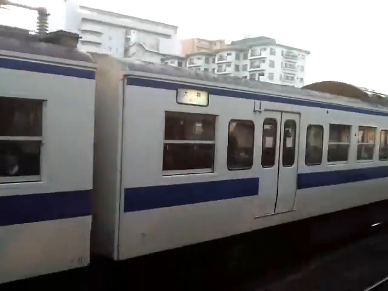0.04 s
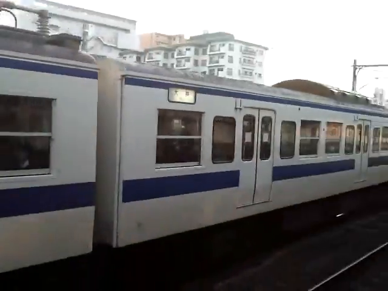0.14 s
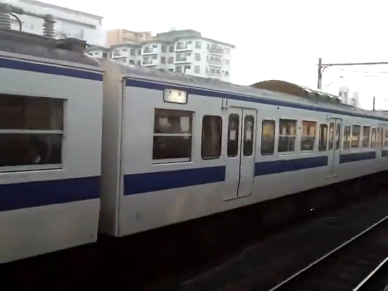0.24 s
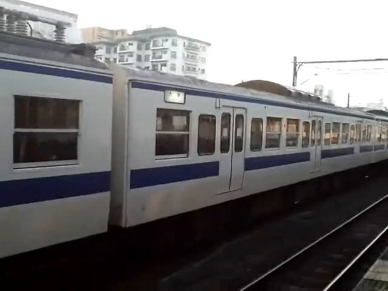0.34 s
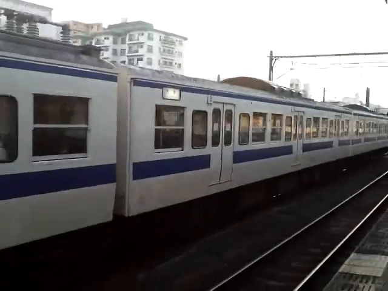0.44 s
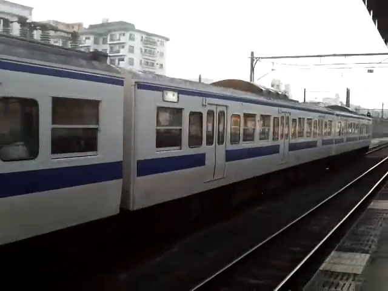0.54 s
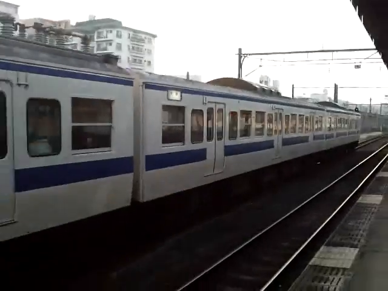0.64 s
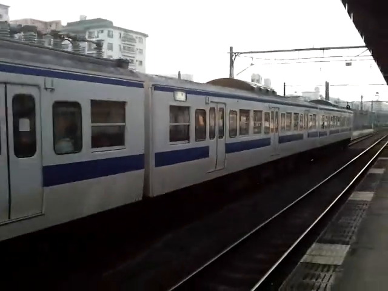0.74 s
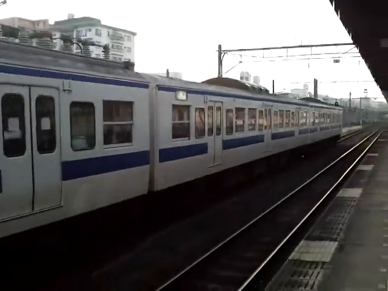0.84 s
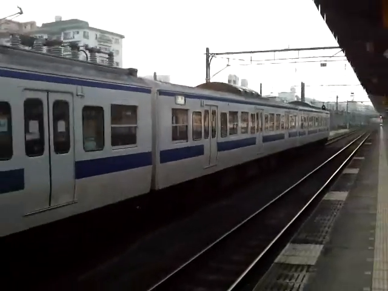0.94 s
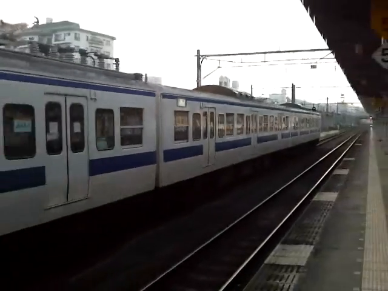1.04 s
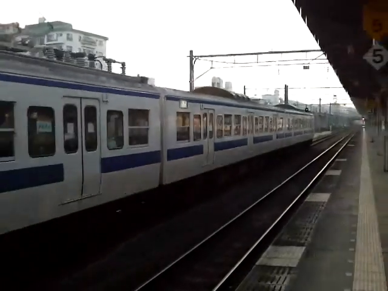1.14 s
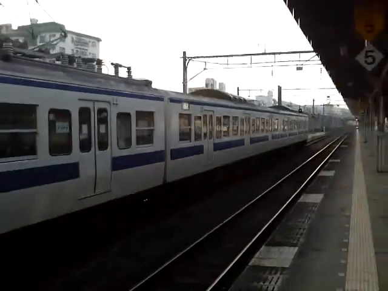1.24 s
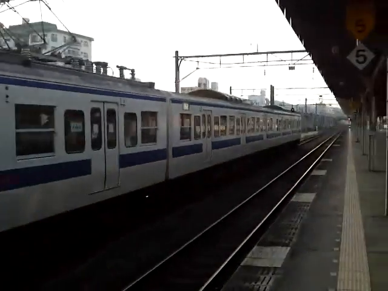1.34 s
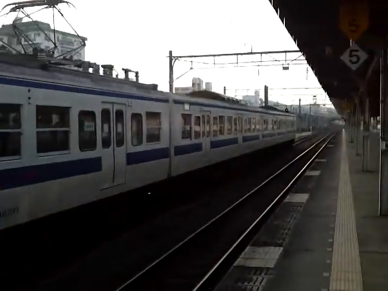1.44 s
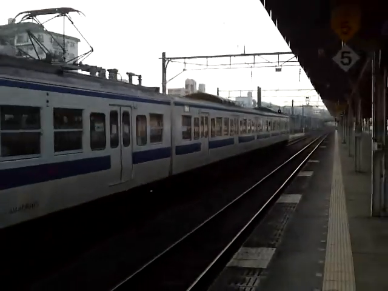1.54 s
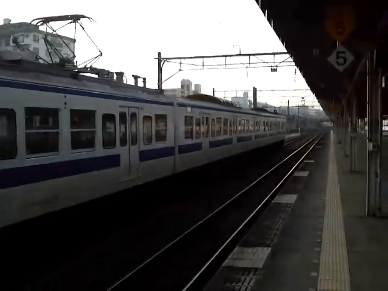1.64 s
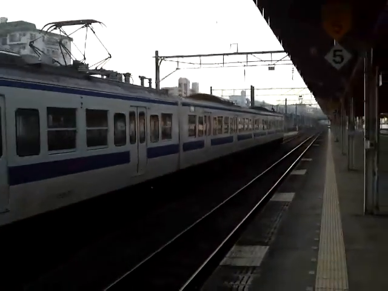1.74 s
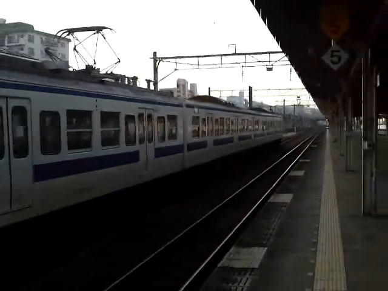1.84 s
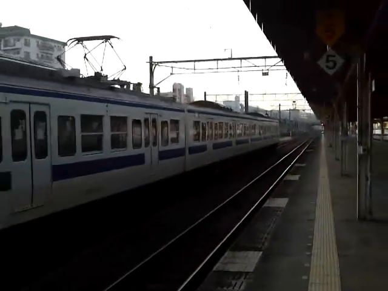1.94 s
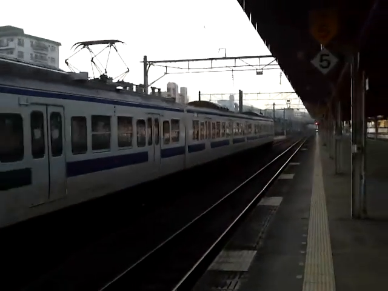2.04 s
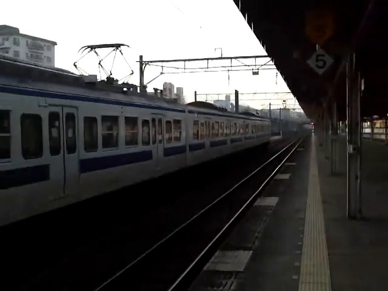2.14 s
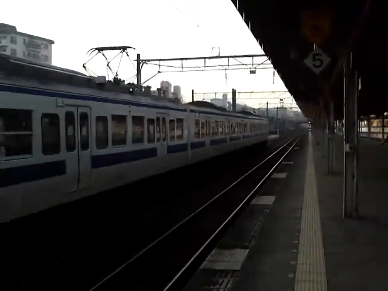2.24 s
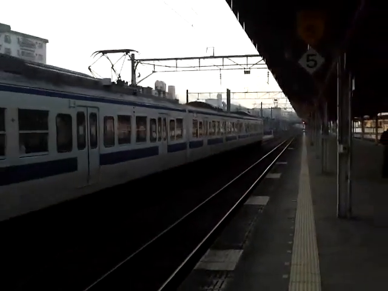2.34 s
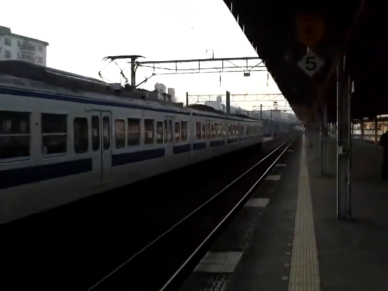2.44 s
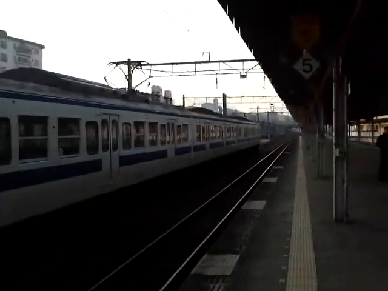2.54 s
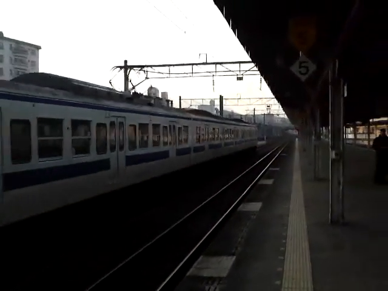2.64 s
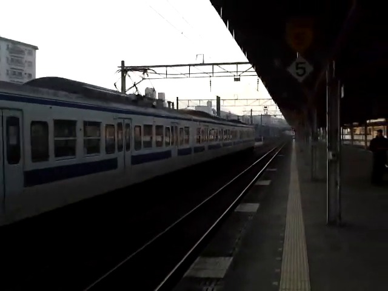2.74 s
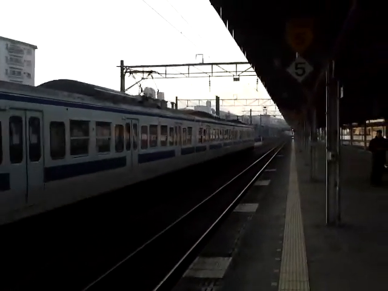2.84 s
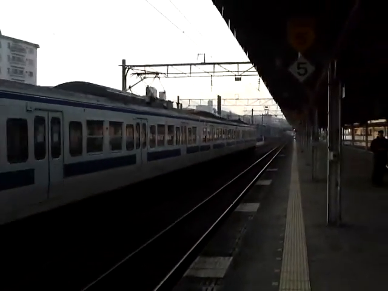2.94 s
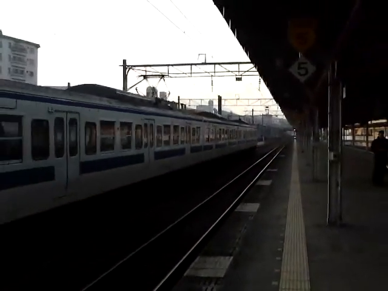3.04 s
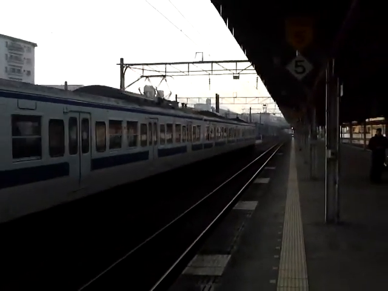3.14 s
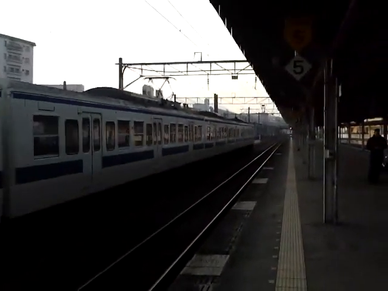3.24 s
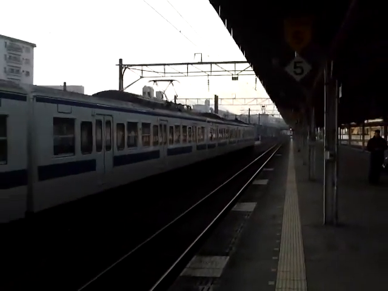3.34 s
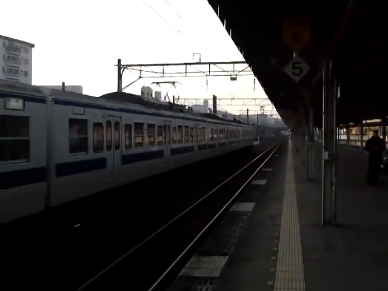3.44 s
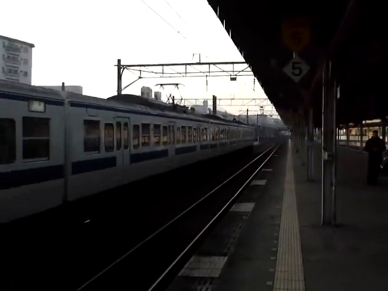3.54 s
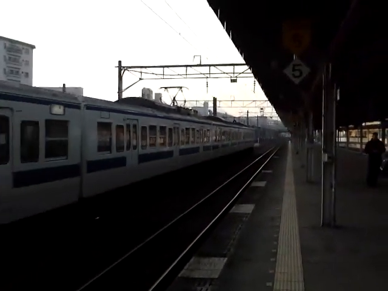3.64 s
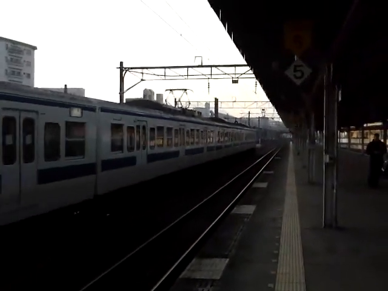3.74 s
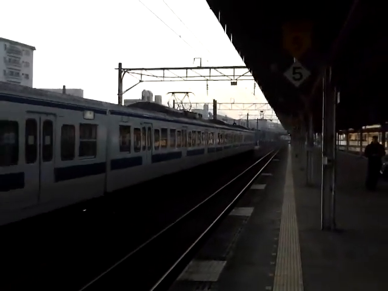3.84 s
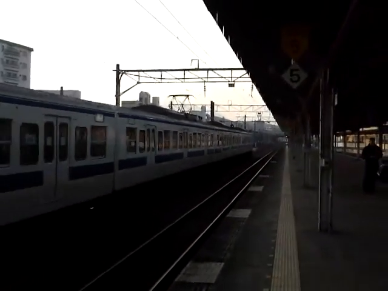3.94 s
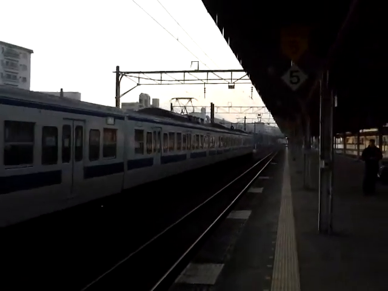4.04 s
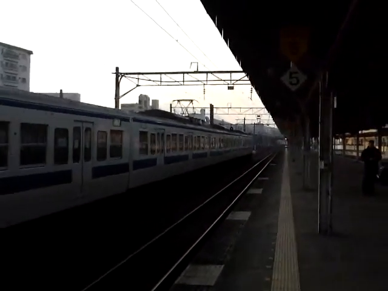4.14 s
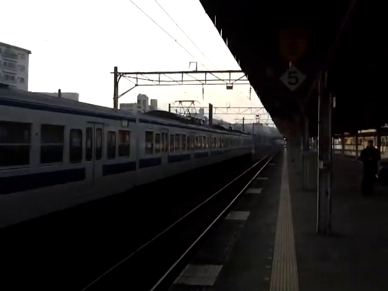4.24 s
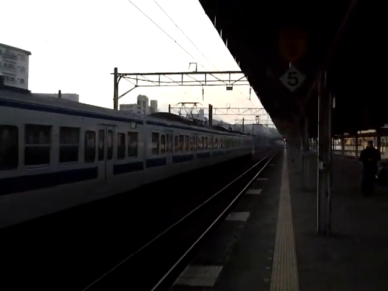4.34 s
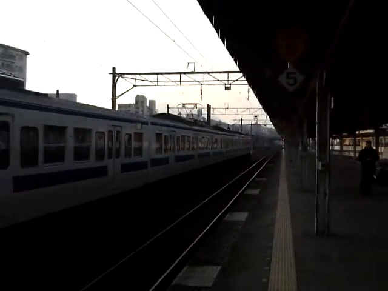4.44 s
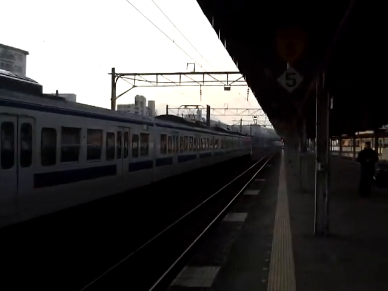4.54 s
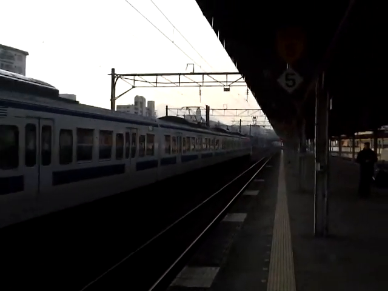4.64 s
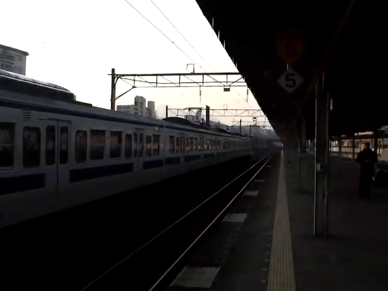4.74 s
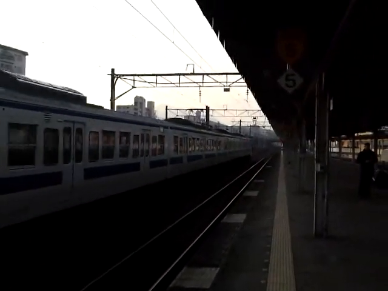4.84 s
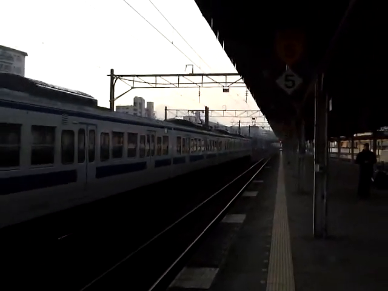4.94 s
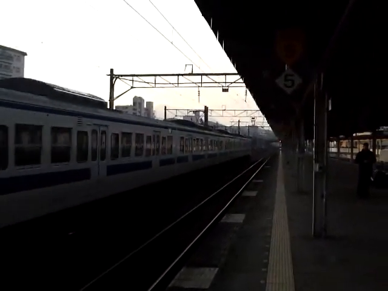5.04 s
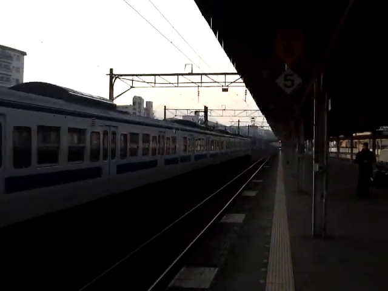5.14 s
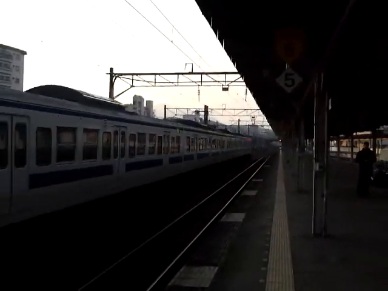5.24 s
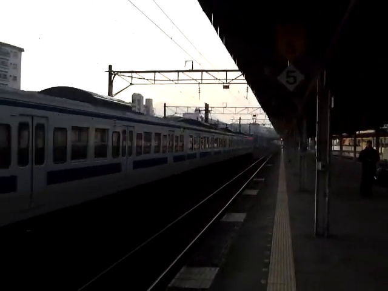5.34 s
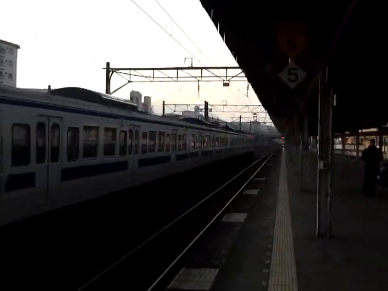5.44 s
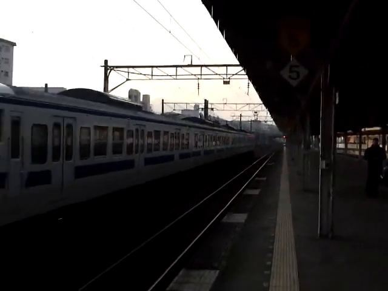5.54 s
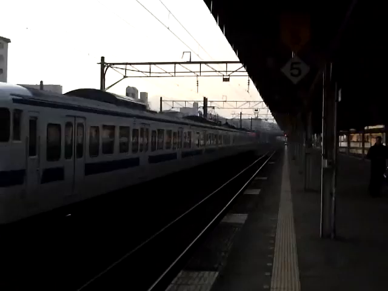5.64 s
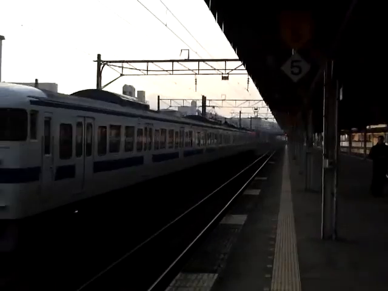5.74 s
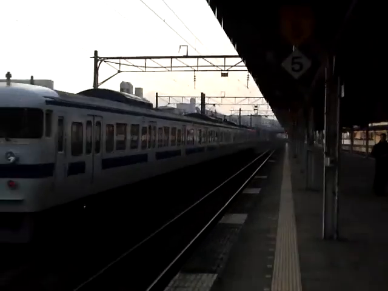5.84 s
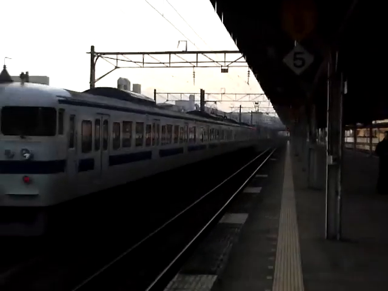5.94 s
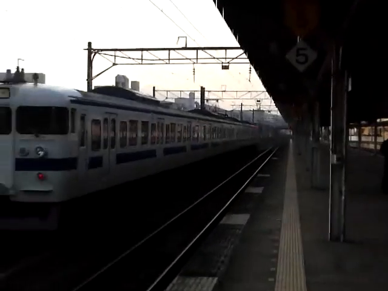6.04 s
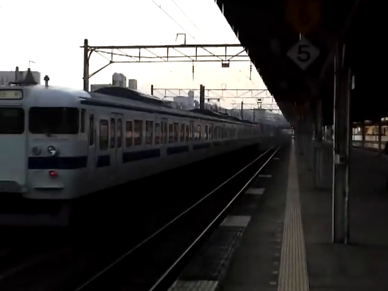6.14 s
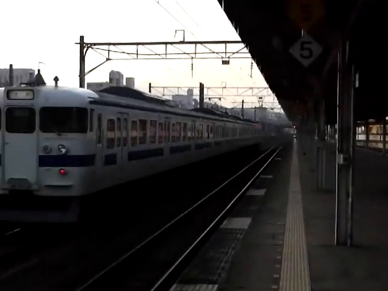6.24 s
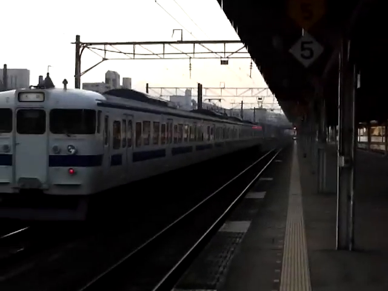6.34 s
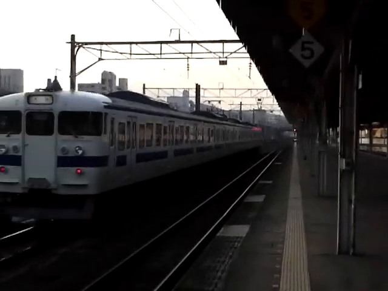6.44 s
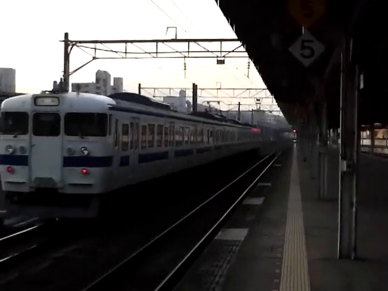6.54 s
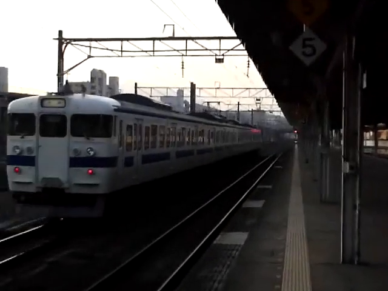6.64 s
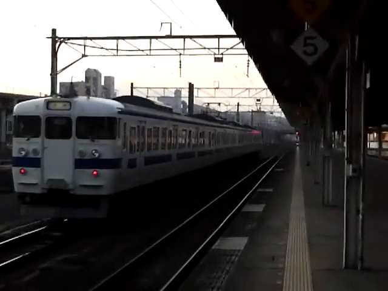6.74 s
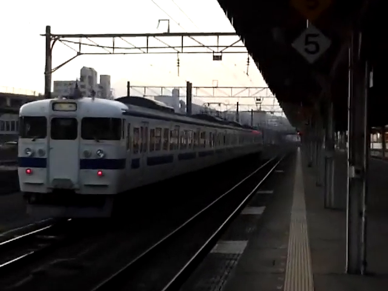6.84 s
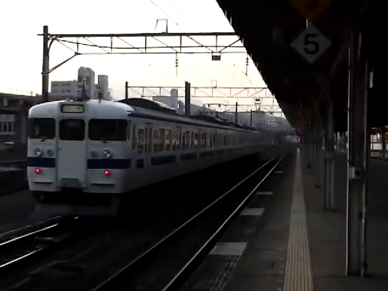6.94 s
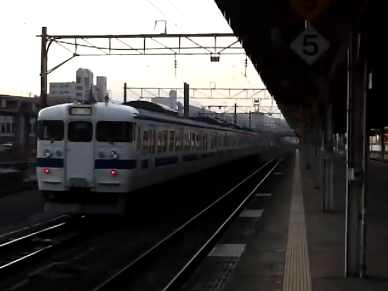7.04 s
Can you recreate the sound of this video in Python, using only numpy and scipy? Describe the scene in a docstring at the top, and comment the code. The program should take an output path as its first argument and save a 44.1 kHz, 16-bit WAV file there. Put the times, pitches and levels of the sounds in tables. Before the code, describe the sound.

Heard from a roofed station platform, an electric train rolls past with a rough steel roar, hiss and rising gear hum. Paired axle clacks strike loudly over a rail joint, ringing under the roof, with dry clicks and one tiny flange squeak. Later the knocks turn faint and smeared as the train recedes. The narrow, thin-bassed microphone distorts on the loudest blows.

```python
"""Steel wheels roar and hiss on the rail as an electric train pulls out along a roofed platform.
The roar is shaped noise; wheel and rail modes and a rising gear hum are wandering sines.
Axles clack over a joint as bursts of noise with a ringing wheel and a tail from the roof.
Dry clicks and a short flange squeak stand out over steady station air.
A narrow-band microphone feeds an input that clips on the loudest blows."""
import sys
import numpy as np
from scipy import signal
from scipy.fft import rfft, irfft, next_fast_len
from scipy.io import wavfile
from scipy.ndimage import uniform_filter1d, map_coordinates

SR = 44100
rng = np.random.default_rng(int(sys.argv[2]) if len(sys.argv) > 2 else 0)


def persist_wave(psi):
    """Save psi, clipped to +-1, as 16-bit WAV."""
    counts = np.round(np.clip(psi, -1, 1) * 32767).astype(np.int16)
    wavfile.write(sys.argv[1], SR, np.atleast_2d(counts).T)


N = 312669
MIC_HZ = 3830  # upper band edge of the microphone


def amp(db):
    """Turn dB into gain."""
    return 10 ** (np.asarray(db) / 20)


def unit(x):
    """Scale x to rms 1."""
    return x / np.sqrt(np.mean(x ** 2) + 1e-20)


def along(points, hz):
    """Read (frequency [Hz], value) points on a log frequency axis, level beyond the ends."""
    f, v = np.transpose(points)
    return np.interp(np.log(hz + 1), np.log(f + 1), v)


def curves(rows):
    """Give one value per sample for each column after the time."""
    s, *cols = np.transpose(rows)
    return [np.interp(np.arange(N) / SR, s, c) for c in cols]


def wobble(rate):
    """Draw a smooth random curve with rate knots a second."""
    knots = rng.standard_normal(int(N * rate / SR) + 4)
    return map_coordinates(knots, [np.arange(N) * rate / SR])


def filtered(x, response):
    """Multiply the spectrum of x by a response of frequency."""
    m = next_fast_len(x.shape[-1] + 8192)
    spectrum = rfft(x, m) * response(np.fft.rfftfreq(m, 1 / SR))
    return irfft(spectrum, m)[..., :x.shape[-1]]


def rush(spectrum, patchy_db):
    """Coloured noise of rms 1 within the microphone's band, in patches of random gain."""
    z = signal.stft(rng.standard_normal(N), nperseg=1024)[2]
    # neighbouring frequencies and moments share their gain
    patches = uniform_filter1d(rng.standard_normal(z.shape), size=4, axis=0)
    patches = uniform_filter1d(patches, size=8, axis=1)
    noise = signal.istft(z * amp(patchy_db * unit(patches)), nperseg=1024)[1][:N]
    return unit(filtered(noise, lambda hz: amp(along(spectrum, hz)) * (hz < MIC_HZ)))


def tone(hz, db, rough, rate):
    """A sine whose phase (rough, radians) and strength wander, with rate knots a second."""
    phase = 2 * np.pi * np.cumsum(hz) / SR + rough * wobble(rate)
    strength = amp(db + 2.9 * rough * wobble(rate))
    return np.sqrt(2) * strength * np.sin(phase)


def rolling():
    """Rough steel on steel: a broad roar and a hiss that shake together."""
    # level of the roar: (time [s], level [dB])
    roar_level = [(0.0, -24), (0.6, -24), (1.26, -23), (1.64, -20.5), (1.91, -24.5), (2.3, -22.5),
                  (2.71, -26), (3.97, -23), (4.48, -27.5), (4.91, -27.5), (5.13, -31.5), (5.53, -31),
                  (6.02, -35.5), (6.65, -45), (7.09, -43.5)]
    # hiss against the roar: (time [s], level [dB])
    hiss_share = [(0, -8.5), (1.3, -8), (2, -11), (6, -10), (7.09, -8.5)]
    # spectrum below the roar: (frequency [Hz], relative density [dB])
    rumble_spectrum = [(20, -17), (60, -6), (100, -5.5)]
    # spectrum of the roar: (frequency [Hz], relative density [dB])
    roar_spectrum = [(120, -23.5), (200, -7), (222, -6), (281, -3), (346, 0), (401, -3.5), (535, -1),
                     (578, -3), (1020, -10), (1110, -6.5), (1600, -25), (2080, -55.5), (3520, -120)]
    # spectrum of the hiss: (frequency [Hz], relative density [dB])
    hiss_spectrum = [(710, -23), (1200, -6.5), (1540, -6.5), (2030, -9.5), (2170, -13.5), (2470, -13.5),
                     (2830, -18), (3380, -20.5), (3660, -23.5), (4760, -40.5), (8050, -120)]
    (roar_db,), (share_db,) = curves(roar_level), curves(hiss_share)
    shake = wobble(7.4)
    roar_gain = amp(roar_db + 1.9 * shake + 0.62 * wobble(25))
    roar = roar_gain * rush(rumble_spectrum + roar_spectrum[1:], patchy_db=1.0)
    hiss_gain = amp(roar_db + share_db + 1.0 * shake + 1.1 * wobble(30))
    return roar + hiss_gain * rush(hiss_spectrum, patchy_db=0.44)


def wheel_and_rail_modes():
    """Rolling keeps wheel and rail modes ringing as fuzzy lines, each loudest as its wheel rolls past."""
    # modes: (pitch when loudest [Hz], sag [Hz/s], roughness [rad], loudest at [s], level [dB],
    # swell [dB/s], fade [dB/s])
    rings = [(343.3, -2, 0.97, .75, -28.5, 5, 5.5), (455, -7.5, 1.1, .6, -31.5, 4, 7.5),
             (684, 4.5, 1.4, 1.2, -35, 9.5, 15), (864, 8.5, 1.2, 0.28, -37, 1, 2.5),
             (541.2, 4, 0.65, 3.65, -28.5, 13, 9), (1084, 11.5, .71, 3.4, -32.5, 20.5, 8),
             (2370, 20, 0.97, 3.5, -50, 6.5, 5.5), (2050, -25.5, 1.9, 4.9, -51.5, 29, 9.5)]
    t, out = np.arange(N) / SR, np.zeros(N)
    for hz, sag, rough, s, db, swell, fade in rings:
        level_db = db - np.where(t < s, swell * (s - t), fade * (t - s))
        out += tone(hz - sag * (t - s), level_db, rough, rate=22)
    return out


def gear_hum():
    """The traction gear's mesh pitch climbs with speed, ever more slowly, until power is cut."""
    # level of the hum: (time [s], level [dB])
    gear_level = [(0, -27), (.9, -34), (1.35, -37), (1.45, -26), (2.2, -23.5), (2.6, -34.5), (2.8, -28.5),
                  (3.1, -36.5), (3.9, -41)]
    start_hz, rise_hz_per_s, ease_hz_per_s2 = 210, 15.5, .9
    t = np.arange(N) / SR
    mesh_hz = start_hz + rise_hz_per_s * t - ease_hz_per_s2 * t ** 2
    # after the last point the hum falls by 120 dB a second
    level_db = curves(gear_level)[0] - 120 * np.clip(t - gear_level[-1][0], 0, None)
    return tone(mesh_hz, level_db, rough=0.36, rate=16)


def flange_squeak():
    """A short squeak of the wheel flange: one rough tone that sags in pitch."""
    at_s, middle_hz, peak_db = 2.197, 1890, -28
    width_s, sag_hz_per_s = 0.016, 600  # width_s away from its middle the squeak is 6 dB down
    since = np.arange(N) / SR - at_s
    level_db = np.maximum(peak_db - 6 * (since / width_s) ** 2, -200)
    return tone(middle_hz - sag_hz_per_s * np.clip(since, -.1, .1), level_db, rough=0.6, rate=40)


def joints():
    """Each axle drops on the next rail: a crack, then a body that the roof prolongs, and the wheel rings."""
    # axle blows: (time [s], level [dB], treble level [dB], rise of the body [ms])
    blows = [(1.459, -6.5, -8.5, 1.2), (1.741, -8.5, -9.5, 1.2), (2.283, -7, -6.5, 1.5),
             (2.554, -7.5, -10, 1.8), (3.189, -22.5, -15, 6.3), (4.001, -5, -8.5, 1.9),
             (4.254, -8, -9, 1.1), (4.4, -23, -12.5, 6), (4.703, -22.5, -17, 4.1), (4.879, -20, -16, 5),
             (5.005, -26, -16, 3), (5.192, -28.5, -14.5, 9), (5.296, -24.5, -14.5, 9),
             (5.332, -26, -6.5, 7.1), (5.562, -24.5, -7.5, 16), (5.607, -21.5, -21, 6),
             (5.899, -24.5, -19.5, 2.5), (6.189, -31.5, -17.5, 15), (6.469, -34, -16, 15),
             (6.76, -39.5, -10, 19), (6.875, -26.5, -8, 25)]
    # modes of a struck wheel: (frequency [Hz], level [dB], decay by 60 dB [s])
    wheel = [(455, -0.5, 0.35), (700, -2.5, 0.45), (960, -4, 0.13), (1103, -3, 0.45), (1153, -3, 0.31),
             (1483, -9, 0.33), (2045, 0, 0.15), (2415, -18.5, 0.37), (2627, -16, 0.65), (3340, -15, 0.68),
             (3450, -15.5, .35)]
    # body of a blow: (frequency [Hz], relative density [dB])
    thud_spectrum = [(150, 2.5), (250, 2), (500, -0.5), (1000, -0.5), (1500, -22)]
    # top of a blow: (frequency [Hz], relative density [dB])
    crack_spectrum = [(1200, 3), (1600, -0.5), (2200, -0.5), (2800, -6), (3300, -10.5), (3800, -11.5)]
    blur = .02  # half width of a struck mode, share of its pitch
    out, t = np.zeros(N + SR), np.arange(SR // 2) / SR
    tail_room = ((0, 0), (0, SR))

    thud = rush(thud_spectrum + [(1800, -66)], patchy_db=2.5)
    crack = rush([(900, -52.5)] + crack_spectrum, patchy_db=4.0)
    rattle = amp(1.9 * wobble(70))  # bogie parts chatter after a blow
    thud, crack = np.pad([thud * rattle, crack * rattle], tail_room)

    # the turning wheel blurs each mode into a narrow band of noise
    modes = []
    for hz, _, _ in wheel:
        band = filtered(rng.standard_normal(N), lambda f: 1 / (1 + ((f - hz) / (blur * hz)) ** 2))
        modes.append(unit(band))
    modes = np.pad(modes, tail_room)

    echo = amp(-19 - 60 * t / 1.1) * (1 - t / t[-1])  # the longer tail under the roof
    impact = amp(-3.5 - 60 * t / 0.03)  # the first bite of steel on steel
    for s, db, treble_db, rise_ms in blows:
        now = slice(round(s * SR), round(s * SR) + len(t))
        # far blows reach the platform smeared by echoes: a slower rise brings a longer decay
        linger_s = 0.0053 * rise_ms
        body_t60_s, top_t60_s = 0.29 + linger_s, 0.26 + linger_s
        onset = 1 - np.exp(-1000 * t / (.08 * rise_ms + .3))
        build = 1 - np.exp(-1000 * t / rise_ms)  # the body builds more slowly than the top
        body = thud[now] * (amp(-60 * t / body_t60_s) + echo) * build
        top = amp(treble_db) * crack[now] * (amp(-60 * t / top_t60_s) + echo + impact)
        ring = np.zeros(len(t))
        for (hz, level, life), mode in zip(wheel, modes):
            # a dull blow hardly wakes the high modes, and the highest fade with distance
            mode_db = level + (treble_db + 9.0) * (hz > 1500) + 0.16 * db * (hz > 3000)
            mode_db += rng.normal(0, 2.0)
            ring += amp(mode_db - 60 * t / life) * mode[now]
        out[now] += amp(db) * onset * (body + top + amp(-11) * ring * build)
    return out[:N]


def dry_clicks():
    """Dry clicks with a low thump: brief noise, a quickly damped sine and a low push."""
    # clicks: (time [s], level [dB], centre [Hz], low push [dB])
    clicks = [(.481, -19.5, 2530, 6), (1.096, -19.5, 2026, 4.5), (1.124, -9, 1880, 2),
              (1.403, -24.5, 2940, -7), (1.632, -10, 1980, 0.5), (4.853, -32.5, 2430, -4),
              (6.392, -24.5, 1050, 3.5)]
    out, t = np.zeros(N + SR), np.arange(SR // 50) / SR
    fade = np.exp(-(t / .0036) ** 2)
    for s, db, hz, push_db in clicks:
        noise = filtered(rng.standard_normal(len(t)), lambda f: f < MIC_HZ)
        snap = np.sin(2 * np.pi * hz * t) + 1.1 * noise
        push = amp(push_db) * np.sin(2 * np.pi * 300 * t)
        out[round(s * SR):][:len(t)] += amp(db) * fade * (snap + push)
    return out[:N]


def station_air():
    """The station's air and far cars: steady, patchy noise far below the train."""
    # spectrum of the air: (frequency [Hz], relative density [dB])
    air_spectrum = [(120, -47.5), (200, -11.5), (605, -1.5), (643, -4.5), (1050, -13), (1940, -39),
                    (2140, -16), (3660, -30.5), (4760, -69.5), (8050, -120)]
    return amp(-43.5) * rush(air_spectrum, patchy_db=2.5)


def scene():
    """All sources, heard from the platform."""
    train = rolling() + wheel_and_rail_modes() + gear_hum() + flange_squeak()
    return (train + joints() + dry_clicks() + station_air())[None]


def clip(x, top, knee):
    """Peaks flatten at top; a larger knee is harder."""
    return x / (1 + np.abs(x / top) ** knee) ** (1 / knee)


def record(dry):
    """The input overloads before the band edge; the output stage clips again and splatters into the treble."""
    # bass roll-off of the microphone: (frequency [Hz], gain [dB])
    bass = [(20, -27.5), (60, -29.5), (100, -27.5), (140, -19), (190, -14), (215, -1)]
    top_hz = 15800  # nothing passes above this
    heard = clip(filtered(dry, lambda hz: amp(along(bass, hz))), top=0.27, knee=10.0)
    narrow = filtered(heard, lambda hz: 1 / (1 + (hz / MIC_HZ) ** 60))
    output = clip(narrow, top=.266, knee=40)
    return filtered(output, lambda hz: hz < top_hz)


dry = scene()
out = record(dry)
persist_wave(out)
```